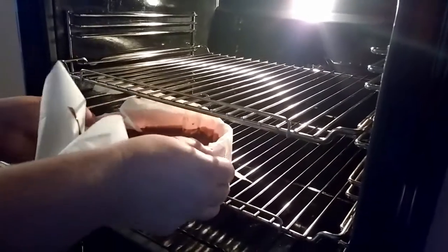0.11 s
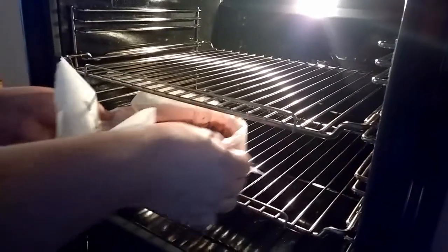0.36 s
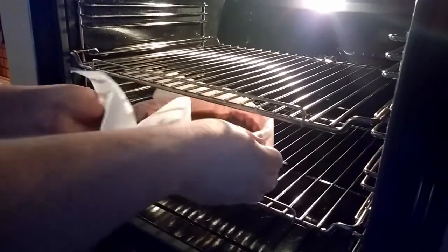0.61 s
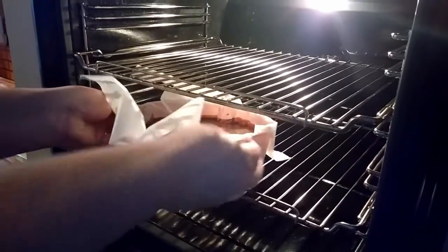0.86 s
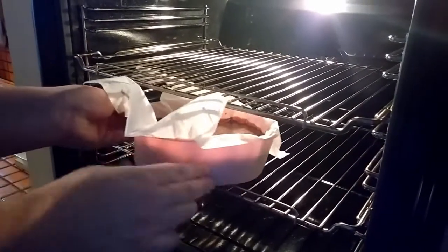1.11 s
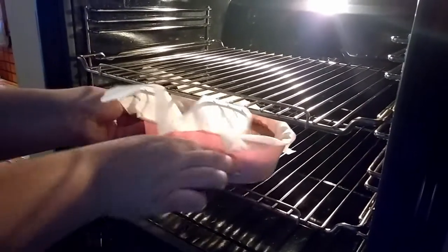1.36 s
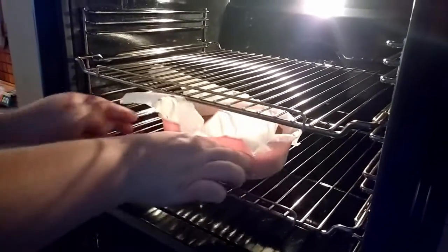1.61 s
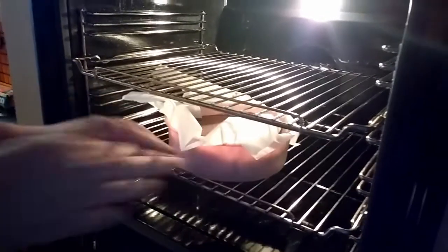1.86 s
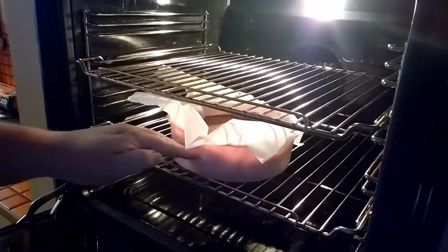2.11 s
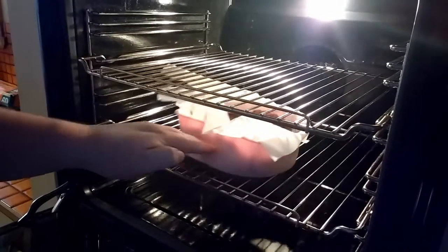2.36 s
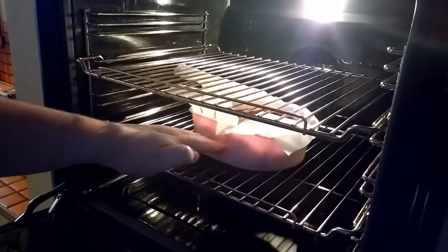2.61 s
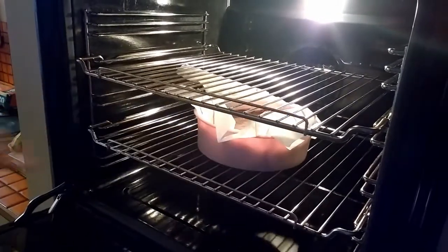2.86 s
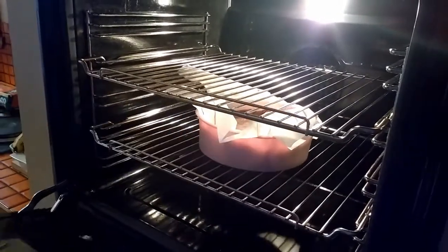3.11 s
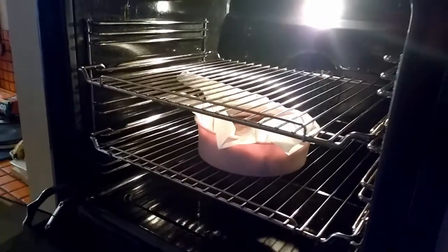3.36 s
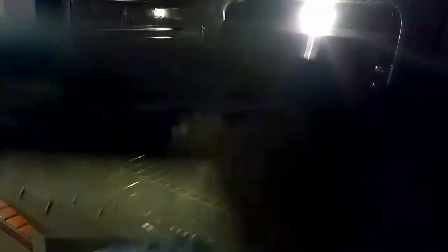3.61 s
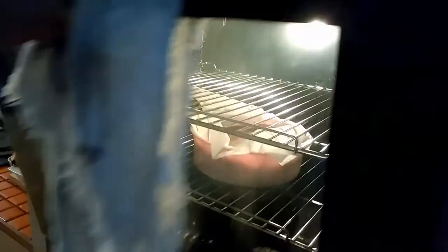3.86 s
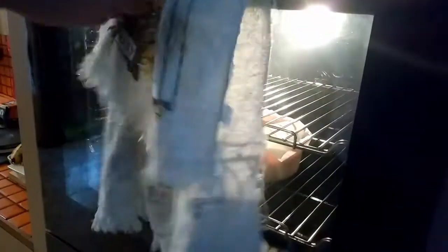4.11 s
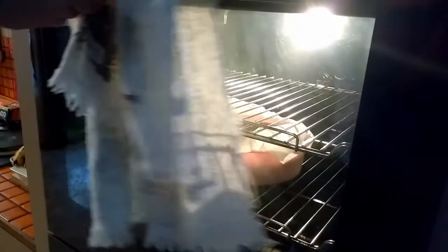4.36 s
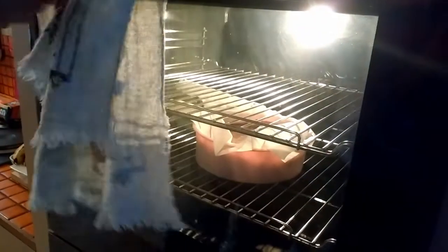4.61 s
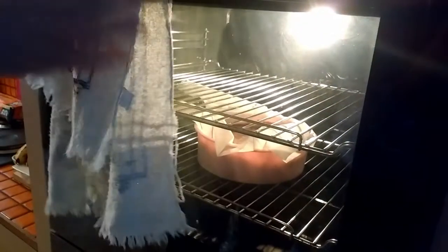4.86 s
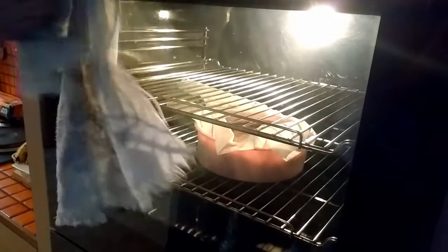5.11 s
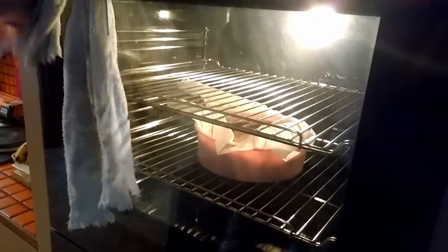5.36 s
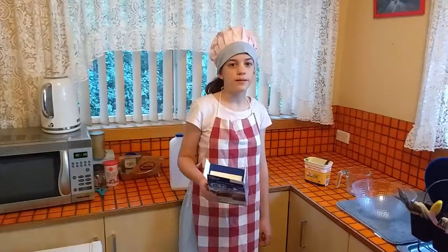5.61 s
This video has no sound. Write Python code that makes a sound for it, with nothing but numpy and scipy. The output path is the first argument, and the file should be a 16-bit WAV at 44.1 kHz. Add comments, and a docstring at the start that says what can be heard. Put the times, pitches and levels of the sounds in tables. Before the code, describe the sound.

Paper rustles and metal ticks over an open oven's airy hum; the door clunks shut hard, leaving a faint muffled drone.

```python
"""A fan oven hums and blows, open, in a kitchen; paper rustles and snaps; a door slams, rattles and muffles the fan.
Fan: coloured noise and wavering sines. A paper-lined tin pushed along the wire rack: random crinkles, noise bursts, pings.
Door: air through its closing gap, knocks ringing the hardware, pressure pulses and sagging panel modes.
Two close microphone ports hear it, unequal in level and phase; near the end all sound drops out and returns lower."""
import sys
import numpy as np
from scipy import signal
from scipy.fft import rfft, irfft, next_fast_len
from scipy.io import wavfile

SR = 44100
rng = np.random.default_rng(int(sys.argv[2]) if len(sys.argv) > 2 else 0)


def store_pcm(level_fs):
    """Save levels as 16-bit WAV."""
    pcm = np.round(np.clip(level_fs, -1, 1) * 32767).astype(np.int16)
    wavfile.write(sys.argv[1], SR, np.atleast_2d(pcm).T)


def volts_from_decibels(level):
    """Turn decibel levels (scalar or array-like) into linear amplitude factors."""
    exponent = np.asarray(level, float) / 20
    return 10 ** exponent


N = 252408

# Noise spectra. Each row: frequency in Hz, relative density in dB per Hz.
AIR_SPECTRUM = [(200, -18.5), (300, -15.5), (430, -8.5), (560, -1), (700, 0.5), (900, -3), (1100, -2),
                (1500, -5.5), (2400, -11.5), (3000, -14), (4500, -32.5)]
CAVITY_SPECTRUM = [(230, -11), (290, 8.5), (350, 10), (430, 10), (520, -23.5)]
RUMBLE_SPECTRUM = [(25, -10.5), (60, -11), (85, -7), (125, 5), (160, 10), (200, 6), (240, 2), (300, -1.5),
                   (400, -49)]
HISS_SPECTRUM = [(1500, -18), (2500, -14.5), (3300, -1.5), (5000, -7.5), (7000, -15.5), (9000, -21),
                 (11000, -27.5), (15000, -32.5), (15700, -67)]
UPPER_HISS_SPECTRUM = [(4200, -24), (5000, -5.5), (6500, -2), (8500, 3.5), (9500, -12.5), (10500, -35)]
MUFFLED_SPECTRUM = [(25, -24.5), (70, -15.5), (100, -8), (150, -5), (250, -7.5), (450, -14), (1000, -15.5),
                    (1600, -14), (2700, -20), (4500, -20.5), (7000, -30.5), (9000, -33.5), (11000, -42.5),
                    (15000, -44), (15900, -66)]
PUFF_SPECTRUM = [(20, -13), (45, -0.5), (80, -1.5), (130, 1.5)]   # air shoved by the swinging door
PAPER_SPECTRUM = [(700, -21.5), (1500, -3.5), (2500, -1.5), (3500, -4.5), (5500, -11), (7000, -9.5),
                  (9000, -19.5), (12000, -24), (15000, -27.5), (15900, -47.5)]
SHEEN_SPECTRUM = [(6000, -30.5), (8000, -3.5), (11000, 2), (15000, -10.5), (15900, -29)]   # brightest part of the paper

# Fan air, door open, then shut in. Each row: time in seconds, level in dB.
FAN_LEVEL = [(0.0, -32.5), (0.41, -30), (0.69, -33.5), (0.95, -32.5), (1.21, -28), (1.33, -27.5),
             (1.44, -33.5), (1.64, -37), (1.9, -34), (2.12, -30), (2.28, -29), (2.5, -34), (2.86, -33),
             (3.02, -30), (3.22, -26.5), (3.42, -24.5), (3.61, -27.5), (3.85, -31), (4.05, -39),
             (4.45, -60.5), (4.6, -99)]
# Low-mid cavity ring, growing as the door comes up. Each row: time in seconds, level in dB against the air.
CAVITY_LEVEL = [(3.0, -17.5), (3.9, -6.5), (4.4, -15.5)]
# Upper fan hiss, coming forward as the door rises. Each row: time in seconds, level in dB.
UPPER_HISS_LEVEL = [(2.7, -75), (3.2, -75), (4.0, -54), (4.3, -84)]
# Rumble through the shut door. Columns: start in seconds, end in seconds, dB at start, dB at end.
SHUT_RUMBLE_STROKE = (1, 10, -68, -57.5)
# Brief level dips. Each row: time in seconds, depth in dB, recovery time constant in seconds.
LEVEL_DIPS = [(1.55, -2.5, 0.079), (2.304, -7, 0.13)]
# Motor and blade tones. Each row: frequency in Hz, dB with door open, dB with door shut, wander in Hz.
MOTOR_TONES = [(100.2, -7.5, -8, 0.27), (200.5, -1, -15, 1.44), (444.6, -11.5, -27, 3),
               (501.8, -10, -35, 2), (670, -8, -31, 3.024), (771, -36, -11.5, 1.2), (1550, -35, -19, 3)]
# Rustling drags of the tin, the last a scuff of the door as it starts up. Each row: start in seconds, end in
# seconds, # dB at start, dB at end.
DRAGS = [(0.0, 0.094, -47, -51), (0.402, 0.63, -44.5, -48), (0.664, 0.895, -41.5, -37),
         (0.936, 1.048, -57, -47.5), (1.261, 1.543, -41, -40.5), (1.58, 1.72, -51, -59),
         (2.159, 2.305, -45, -38.5), (3.701, 3.817, -43.5, -52)]
# Paper snaps, ticks of tin and wire. Each row: time in seconds, reference level in dB, t60 in seconds,
# ping in Hz, sheen in dB against the reference.
SNAP_EVENTS = [(0.0162, -16.5, 0.066, 1550, -27), (0.098, -27.5, 0.033, 1550, -36),
               (0.3604, -24, 0.038, 3890, -25), (0.395, -20.5, 0.049, 1690, -16.5),
               (0.412, -21.5, 0.033, 1650, -17), (0.496, -19, 0.027, 3270, -22),
               (0.511, -10.5, 0.031, 1910, -25.5), (0.5521, -19.5, 0.027, 1950, -22.5),
               (0.5713, -21.5, 0.045, 3130, -17), (0.6137, -27, .04, 3300, -33),
               (0.667, -20, 0.04, 1510, -20), (0.676, -22.5, .05, 3300, -21),
               (0.689, -14.5, 0.062, 3200, -23), (0.71, -17.5, 0.046, 3300, -27),
               (0.744, -15.5, 0.017, 3250, -29), (0.8506, -17, 0.11, 2820, -20.5),
               (0.874, -18.5, 0.08, 3300, -22), (0.958, -17.5, 0.044, 1840, -30),
               (1.2525, -17.5, 0.04, 1600, -40), (1.259, -18.5, .04, 1600, -31),
               (1.283, -18.5, 0.04, 1660, -28.5), (1.3435, -17.5, 0.11, 3350, -27.5),
               (1.356, -19.5, .05, 3370, -26.5), (1.368, -21, 0.11, 3180, -24),
               (1.445, -14.5, 0.048, 1600, -18), (1.485, -17.5, 0.054, 3400, -25),
               (1.5192, -22, 0.046, 3300, -29), (1.5436, -19, 0.04, 3380, -12),
               (1.618, -23, 0.081, 3200, -23), (1.6639, -25, 0.075, 3290, -22),
               (1.719, -29.5, 0.072, 1690, -27), (1.9871, -18.5, 0.053, 3100, -17.5),
               (2.2171, -22, 0.046, 1550, -23.5), (2.2301, -16, 0.093, 3340, -25.5),
               (2.2556, -15.5, 0.065, 1600, -22.5), (2.296, -16, 0.033, 1550, -18.5),
               (2.6103, -13, 0.05, 3370, -21.5), (2.817, -27, 0.077, 1770, -25.5),
               (3.6787, -19, 0.06, 3300, -40), (3.7062, -11, 0.022, 7100, -30)]
# Tin resonances. Each row: frequency in Hz, width in Hz, level in dB.
TIN_MODES = [(1210, 700, 4.5), (1650, 230, -9.5)]
# Sliding airy bands. Each row: start in seconds, end in seconds, dB at start, dB at end, from Hz, to Hz.
SLIDING_BANDS = [(3.5, 4, -60, -57, 5000, 2900), (4.86, 5.137, -59, -62, 2300, 3120),
                 (5.25, 5.358, -58, -51.5, 3960, 2900), (5.38, 5.594, -63.5, -55, 3200, 3750),
                 (5.37, 5.6, -63.5, -61, 6400, 7200)]
# Whistle of the door gap. Each row: frequency in Hz, width in Hz, level in dB.
GAP_MODES = [(1310, 34, -0.43), (1600, 360, -1.1)]
# Door hardware knocking as it swings and after it shuts. Each row: time in seconds, reference level in dB,
# t60 in seconds, contact pitch in Hz.
KNOCK_EVENTS = [(3.696, -8.5, 0.033, 840), (3.7011, -6, 0.026, 800), (3.7063, -7.5, 0.078, 825),
                (3.7309, -9.5, 0.057, 920), (3.740, -13, 0.059, 1200), (3.7552, -8, 0.046, 865),
                (3.798, -11, 0.06, 840), (4.0415, -18.5, 0.077, 1250), (4.071, -25, 0.046, 1300),
                (4.1367, -16, 0.087, 1400), (4.189, -22.5, 0.11, 1270), (4.1973, -19.5, 0.082, 1320),
                (4.2435, -22, 0.15, 1190), (4.341, -25.5, 0.092, 1200), (4.3862, -33, 0.076, 1200),
                (4.8552, -25, 0.13, 210), (4.855, -32.5, 0.16, 700), (4.8587, -37, 0.14, 1450)]
# Hardware resonances. Each row: frequency in Hz, width in Hz, level in dB.
HARDWARE_MODES = [(191, 48, 2), (340, 180, -3), (638, 37, -1), (1000, 170, -3.5), (1374, 57, 1),
                  (1550, 77, -5), (1918, 100, 0), (2400, 410, -4), (3300, 510, -9), (4400, 610, -9.5)]
# Door panel modes. Each row: settled frequency in Hz, level in dB, t60 in seconds.
PANEL_MODES = [(48.3, -25, 0.2), (78.5, -21.5, 0.19), (159.4, -11, 0.2), (210, -21, 0.26)]
# The two ports. Each row: frequency in Hz, left over right in dB, left's lead in radians, likeness 0-1.
PORT_RESPONSE = [(50, 6, -2.2, .9), (160, 8, -1.9, .96), (300, 9, -1.75, .87), (650, 0, -1.0, .95),
                 (900, 0, -.45, .93), (1200, -.5, 0, .98), (1500, -3, .35, .85), (1800, -5, 1.8, .7),
                 (2450, -1.5, 3.14, .95), (3000, 0, 4.6, .55), (3500, .5, 6.2, .62), (4950, -1, 3.14, .6),
                 (7550, -3, -3.14, .7), (10300, -4, -9.4, .6), (15500, -7, -19.5, .55)]

USUAL_AIR_DB = -32
HUM_DB, RUMBLE_DB, HISS_DB = -37, -37.5, -46   # at the usual air level
HUM_FOLLOWS, HISS_FOLLOWS = 0.73, 0.67   # share of the air's swing in dB
WHINE_ABOVE_HZ, WHINE_SAG_PER_S, WHINE_NOMINAL_S = 720, 0.007, 5
SHUT_TONES_DB, SHUT_TONES_FOLLOW, USUAL_SHUT_DB = -47, 0.4, -47
GAP_PEAK_S, GAP_DRIVE_DB, GAP_RISE_DB_PER_S, GAP_FALL_DB_PER_S = 4.025, -13.5, 96, 91
GAP_SEALED_S, GAP_SEAL_DB_PER_S = 4.33, 130   # extra fall once sealed
SHOVE_DB, SHOVE_RISE_DB_PER_S, SHOVE_FALL_DB_PER_S = -37, 55, 50
DRAG_RISE_DB_PER_S, DRAG_FALL_DB_PER_S = 740, 380
CRINKLES_PER_S, CRINKLE_T60_S = 900, 0.051
CRINKLE_Q, CRINKLE_RING_DB = 4.1, -4   # ring against the grain
RUSTLE_DB, RUSTLE_SHEEN_DB, RASP_DB = 2.0, -14, -3.5   # against the drag level
CRACKLE_DB, PING_DB, PING_T60_CYCLES = -7, -5.5, 81
SNAP_COLOUR_DB, SNAP_SPREAD_S, SNAP_DB_PER_OCTAVE = 3.5, 0.002, -3.0
TIN_DB, TIN_DB_PER_OCTAVE, TIN_REF_HZ = -2.5, -4.5, 1600   # low snaps ring the tin more
SWISH_RISE_DB_PER_S, SWISH_FALL_DB_PER_S = 240, 170
CHATTER_DB, KNOCK_TAIL_DB, KNOCK_TAIL_STRETCH = 7, -2, 2.2
CLICK_DB, CONTACT_REF_HZ = 30.5, 1400
TAP_DB, TAP_DB_PER_OCTAVE, TAP_SWELL_CYCLES = 6, 11, 0.38
SLAM_S, CRACK_DB, THUD_DB, THUD_T60_S, RATTLE_DB = 4.0255, -19.5, -29, 0.14, 2.2
DROPOUT_S, SILENT_S, DROPOUT_DB, RETURN_DB, RETURN_S = 5.531, 0.023, -58, -18, 0.042


def curve(rows):
    """Joins (time, value) rows by straight lines, one value a sample."""
    s, value = np.transpose(rows)
    return np.interp(np.arange(N) / SR, s, value)


def stroke(start, end, start_db, end_db, rise, fall):
    """Level in dB: straight from start to end, entered and left at slopes in dB per s."""
    t = np.arange(N) / SR
    level_db = np.interp(t, [start, end], [start_db, end_db])
    return level_db - rise * np.maximum(start - t, 0) - fall * np.maximum(t - end, 0)


def noise():
    """Two unrelated draws, one for each path to the ports."""
    return rng.standard_normal((2, N))


def coloured(x, spectrum, band_hz):
    """Shapes x by a spectrum; rms 1 inside the band."""
    size = next_fast_len(N)
    hz = np.arange(size // 2 + 1) * SR / size + 1e-3   # keeps the log finite
    at, db = np.transpose(spectrum)
    gain_db = np.interp(np.log(hz), np.log(at), db, left=-120, right=-120)
    shaped = rfft(x, size) * volts_from_decibels(gain_db)
    inside = (hz > band_hz[0]) & (hz < band_hz[1])
    power = 2 * np.mean(np.sum(abs(shaped[..., inside]) ** 2, axis=-1))
    return irfft(shaped, size)[..., :N] * size / np.sqrt(power)


def drift(rate_hz):
    """Slow random wander, drawn at every 20th sample; spread 1."""
    r = np.exp(-2 * 20 * np.pi * rate_hz / SR)
    draws = rng.standard_normal((N + SR) // 20 + 2)
    slow = signal.lfilter([1], [1, -2 * r, r * r], draws)[SR // 20:]   # settled part
    return np.interp(np.arange(N) / 20, np.arange(len(slow)), slow / slow.std())


def resonances(x, modes):
    """Parallel two-pole resonators, signs alternating."""
    out = 0
    for k, (hz, width_hz, db) in enumerate(modes):
        r = np.exp(-np.pi * width_hz / SR)
        feed = [(1 - r * r) / 2, 0, (r * r - 1) / 2]
        back = [1, -2 * r * np.cos(2 * np.pi * hz / SR), r * r]
        out = out + (-1) ** k * volts_from_decibels(db) * signal.lfilter(feed, back, x + 1e-18)
    return out


def bursts(times_s, level_db, t60_s):
    """Envelope that jumps at each time and dies away exponentially."""
    out, age = np.zeros(N), np.arange(SR // 4) / SR
    for s, db, decay in zip(times_s, level_db, t60_s):
        i = round(s * SR)
        out[i:i + len(age)] += volts_from_decibels(db - 60 * age / decay)[:N - i]
    return out


def fan_air():
    """Turbulent air as bands of noise: main blow, cavity ring, rumble and two hisses, each with its own level."""
    air_db = curve(FAN_LEVEL)
    swing_db = air_db - USUAL_AIR_DB
    out = volts_from_decibels(air_db + 1.0 * drift(12.3)) * coloured(noise(), AIR_SPECTRUM, (450, 1100))
    out += volts_from_decibels(air_db + curve(CAVITY_LEVEL)) * coloured(noise(), CAVITY_SPECTRUM, (230, 520))
    rumble = volts_from_decibels(RUMBLE_DB + HUM_FOLLOWS * swing_db + 1.3 * drift(5.0))
    rumble = rumble + volts_from_decibels(stroke(*SHUT_RUMBLE_STROKE, 100, 0))
    out += rumble * coloured(noise(), RUMBLE_SPECTRUM, (80, 260))
    hiss_db = HISS_DB + HISS_FOLLOWS * swing_db + 1.5 * drift(4.2)
    out += volts_from_decibels(hiss_db) * coloured(noise(), HISS_SPECTRUM, (2800, 4500))
    return out + volts_from_decibels(curve(UPPER_HISS_LEVEL)) * coloured(noise(), UPPER_HISS_SPECTRUM, (4200, 10500))


def shut_fan_db():
    """Level of the muffled fan, fading in and then rising slowly."""
    return stroke(4.5, 5.5, -50, -41.5, 18, 0)


def motor_tones():
    """Motor and blade sines wandering in pitch and level; the door swaps their balance and the high whines sag."""
    t = np.arange(N) / SR
    open_hum_db = HUM_DB + HUM_FOLLOWS * (curve(FAN_LEVEL) - USUAL_AIR_DB)
    shut_hum_db = SHUT_TONES_DB + SHUT_TONES_FOLLOW * (shut_fan_db() - USUAL_SHUT_DB)
    shut_hum_db -= 100 * np.maximum(GAP_SEALED_S + 0.075 - t, 0)
    out = np.zeros(N)
    for hz, open_db, shut_db, wander_hz in MOTOR_TONES:
        sag = WHINE_SAG_PER_S * (t - WHINE_NOMINAL_S) * (hz > WHINE_ABOVE_HZ)
        pitch_hz = hz * (1 - sag) + wander_hz * drift(3.08)
        level = volts_from_decibels(open_hum_db + open_db) + volts_from_decibels(shut_hum_db + shut_db)
        sine = np.sin(np.cumsum(2 * np.pi * pitch_hz / SR))
        out += level * volts_from_decibels(1.6 * drift(4.6)) * np.sqrt(2) * sine
    return out


def rustle():
    """Dense clumped crinkles, each a decaying grain with a short ring, plus sheen and a smooth tin rasp, under the drags."""
    level = sum(volts_from_decibels(stroke(*drag, DRAG_RISE_DB_PER_S, DRAG_FALL_DB_PER_S)) for drag in DRAGS)
    born = rng.random(N) < CRINKLES_PER_S * volts_from_decibels(3.5 * drift(60)) / SR   # chance itself drifts
    sizes = born * volts_from_decibels(3.0 * np.minimum(rng.exponential(1, N), 5))
    grain = signal.lfilter([1], [1, -volts_from_decibels(-60 / (CRINKLE_T60_S * SR))], sizes)
    pitches_hz = np.geomspace(2200, 14000, num=10)
    dealt = rng.integers(0, 10, size=(2, N))   # which pitch each crinkle rings
    rings = sum(resonances(sizes * (dealt == k), [(hz, hz / CRINKLE_Q, 0)])
                for k, hz in enumerate(pitches_hz))
    crinkles = grain * noise() / np.sqrt(np.mean(grain ** 2))
    crinkles += volts_from_decibels(CRINKLE_RING_DB) * rings / rings.std()
    out = level * volts_from_decibels(RUSTLE_DB) * coloured(crinkles, PAPER_SPECTRUM, (5000, 12000))
    out += level * volts_from_decibels(RUSTLE_SHEEN_DB) * coloured(noise(), SHEEN_SPECTRUM, (6000, 15000))
    return out + level * volts_from_decibels(RASP_DB) * coloured(noise(), HISS_SPECTRUM, (2800, 4500))


def snaps():
    """Each snap is a bright crackle, a decaying ping at a pitch of its own and a duller ring of the tin."""
    s, ref_db, t60_s, ping_hz, sheen_db = np.transpose(SNAP_EVENTS)
    crackle = coloured(noise(), PAPER_SPECTRUM, (2500, 14000))
    edges_hz = np.geomspace(700, 16000, num=9)
    # each snap favours other bands, which break a little apart
    colour_db = SNAP_COLOUR_DB * rng.standard_normal((len(s), len(edges_hz)))
    late_s = SNAP_SPREAD_S * rng.random((len(s), len(edges_hz)))
    out = np.zeros((2, N))
    for k in range(len(edges_hz) - 1):
        octaves = abs(np.log2(edges_hz[k] / ping_hz))   # thins away from the ping
        band_db = ref_db + CRACKLE_DB + colour_db[:, k] + SNAP_DB_PER_OCTAVE * octaves
        band = signal.butter(1, edges_hz[k:k + 2], "band", fs=SR, output="sos")
        out += bursts(s + late_s[:, k], band_db, t60_s) * signal.sosfilt(band, crackle)
    out += bursts(s, ref_db + sheen_db, t60_s) * coloured(noise(), SHEEN_SPECTRUM, (6000, 15000))
    tin_db = ref_db + TIN_DB + TIN_DB_PER_OCTAVE * np.log2(ping_hz / TIN_REF_HZ)
    out += resonances(bursts(s, tin_db, t60_s) * noise(), TIN_MODES)
    age = np.arange(SR // 20) / SR
    for at, db, hz in zip(s, ref_db, ping_hz):
        i = round(at * SR)
        fading = volts_from_decibels(db + PING_DB - 60 * age * hz / PING_T60_CYCLES)
        out[:, i:i + len(age)] += fading * np.sin(2 * np.pi * hz * age)
    return out


def level_dips():
    """Gain that drops at once and comes back slowly at each dip."""
    t, gain_db = np.arange(N) / SR, np.zeros(N)
    for s, db, recovery_s in LEVEL_DIPS:
        gain_db += db * np.exp(-np.maximum(t - s, 0) / recovery_s) * (t > s)
    return volts_from_decibels(gain_db)


def swish():
    """Soft airy bands: low-passed noise on a carrier that slides in pitch."""
    out, t = 0, np.arange(N) / SR
    low = signal.butter(2, 220, fs=SR, output="sos")
    spread = signal.sosfilt(low, rng.standard_normal((2, 2, N)))
    flutter_db = 3.5 * drift(3.3)
    for start, end, start_db, end_db, from_hz, to_hz in SLIDING_BANDS:
        phase = np.cumsum(2 * np.pi * np.interp(t, [start, end], [from_hz, to_hz]) / SR)
        band = spread[0] * np.cos(phase) + spread[1] * np.sin(phase)
        level_db = stroke(start, end, start_db, end_db, SWISH_RISE_DB_PER_S, SWISH_FALL_DB_PER_S)
        out = out + volts_from_decibels(level_db + flutter_db) * band / band.std()
    return out


def door_air():
    """Noise whistling through the narrowing door gap, and a low puff shoved by the swing."""
    t = np.arange(N) / SR
    gap_db = stroke(GAP_PEAK_S, GAP_PEAK_S + 1e-3, 0, 0, GAP_RISE_DB_PER_S, GAP_FALL_DB_PER_S)
    gap_db -= GAP_SEAL_DB_PER_S * np.maximum(t - GAP_SEALED_S, 0)
    shove_db = stroke(GAP_PEAK_S, GAP_PEAK_S + 1e-3, SHOVE_DB, SHOVE_DB,
                      SHOVE_RISE_DB_PER_S, SHOVE_FALL_DB_PER_S)
    out = volts_from_decibels(gap_db + GAP_DRIVE_DB) * resonances(noise(), GAP_MODES)
    return out + volts_from_decibels(shove_db) * coloured(noise(), PUFF_SPECTRUM, (20, 130))


def knocks():
    """A sharp tap; a click and a short chatter, coloured by the contact's own pitch, ring the hardware."""
    out, taps, age = np.zeros((2, N)), np.zeros(N), np.arange(SR // 4) / SR
    chatter = rng.standard_normal((len(KNOCK_EVENTS), 2, len(age)))
    for (s, db, t60_s, hz), shake in zip(KNOCK_EVENTS, chatter):
        fading_db = -60 * age / t60_s
        tail = volts_from_decibels(KNOCK_TAIL_DB + fading_db / KNOCK_TAIL_STRETCH)   # weaker, longer
        blow = (volts_from_decibels(CHATTER_DB + fading_db) + tail) * shake
        blow[:, 0] += volts_from_decibels(CLICK_DB) * hz / CONTACT_REF_HZ   # a harder contact clicks more sharply
        for _ in range(2):
            blow = signal.lfilter(*signal.butter(2, 2.38 * hz, fs=SR), blow)   # a softer one is duller
        blow = signal.lfilter(*signal.butter(1, 0.44 * hz, "high", fs=SR), blow)   # a small one lacks bass
        i = round(s * SR)
        out[:, i:i + len(age)] += volts_from_decibels(db) * blow
        swell = age * hz / TAP_SWELL_CYCLES
        tap_db = db + TAP_DB + TAP_DB_PER_OCTAVE * np.log2(hz / CONTACT_REF_HZ)
        taps[i:i + len(age)] += volts_from_decibels(tap_db) * swell * np.exp(1 - swell) * np.sin(2 * np.pi * hz * age)
    return resonances(out, HARDWARE_MODES) + taps


def slam():
    """Pressure pulses, a crack in two parts, a dull frame thud and low panel modes sagging in pitch."""
    since = np.arange(N) / SR - SLAM_S
    age = np.maximum(since, 0)
    contacts_s = [SLAM_S + 0.0015, SLAM_S + 0.014]
    crack = bursts(contacts_s, [CRACK_DB, CRACK_DB - 6.5], [0.045, 0.05])
    out = crack * coloured(noise(), PAPER_SPECTRUM, (700, 14000))
    out += 0.3 * np.exp(-(since / 0.0004) ** 2)   # the seal meets the frame first
    out += 1.05 * np.exp(-((age - 0.0007) / 0.00017) ** 2) * (age > 0)   # main pulse
    out -= 0.12 * np.exp(-((age - 0.004) / 0.002) ** 2) * (age > 0)   # the air springs back
    thud = bursts(contacts_s, [THUD_DB, THUD_DB], [THUD_T60_S] * 2)
    out += thud * coloured(noise(), CAVITY_SPECTRUM, (230, 520))
    stretched = age + 0.28 * 0.041 * (1 - np.exp(-age / 0.042))   # tense at first, then slack
    for hz, db, t60_s in PANEL_MODES:
        level = volts_from_decibels(db - 60 * age / t60_s + RATTLE_DB * drift(25.0))   # uneven ring
        out += level * (1 - np.exp(-age / 0.03)) * np.sin(2 * np.pi * hz * stretched)
    return out


def shut_fan():
    """Fan noise through the shut door, its treble muffled."""
    return volts_from_decibels(shut_fan_db()) * coloured(noise(), MUFFLED_SPECTRUM, (60, 8000))


def dropout():
    """Gain that falls away in 2.7 ms, holds, and returns part of the way."""
    age = np.arange(N) / SR - DROPOUT_S
    back = np.exp(-np.maximum(age - SILENT_S, 0) / RETURN_S)
    return volts_from_decibels(np.clip(age / 0.0027, 0, 1) * (RETURN_DB + (DROPOUT_DB - RETURN_DB) * back))


def ports(paths, treble_db):
    """The right port hears the left's path shifted in phase and level, mixed with the unrelated path."""
    size = next_fast_len(N + 4096)
    hz = np.arange(size // 2 + 1) * SR / size
    at, *columns = np.transpose(PORT_RESPONSE)
    tilt_db, lead_rad, alike = [np.interp(hz, at, c) for c in columns]
    tilt_db = tilt_db + treble_db * np.clip(hz / 15000, 0, 1)   # the body shades the treble by direction
    shared, own = rfft(paths, size)
    left_gain = np.sqrt(2 / (1 + volts_from_decibels(-2 * tilt_db)))   # total power is kept
    right = alike * shared + np.sqrt(1 - alike ** 2) * own
    right = right * np.exp(-1j * lead_rad) * volts_from_decibels(-tilt_db)
    return irfft(left_gain * np.array([shared, right]), size)[:, :N]


def scene():
    """The fan and the contacts arrive from different directions."""
    fan = level_dips() * (fan_air() + motor_tones() + door_air() + shut_fan())
    contacts = rustle() + snaps() + knocks() + slam()
    return dropout() * (ports(fan + swish(), treble_db=-1.5) + ports(contacts, treble_db=3.0))


def roll_off(x):
    """The treble ends steeply here."""
    return signal.sosfilt(signal.butter(12, 15980, fs=SR, output="sos"), x)


def record(dry):
    """Cuts the deepest bass and clips at full scale."""
    high_pass = signal.butter(2, 40, "high", fs=SR, output="sos")
    mix = np.clip(signal.sosfilt(high_pass, dry), -1, 1)
    return roll_off(mix)


dry = scene()
out = record(dry)
store_pcm(out)
```